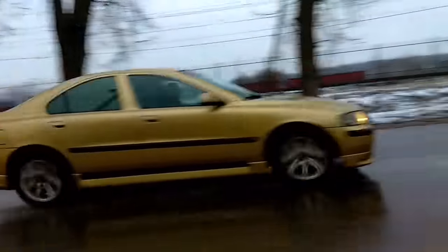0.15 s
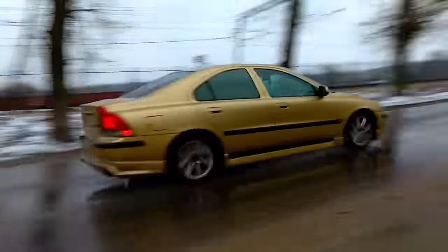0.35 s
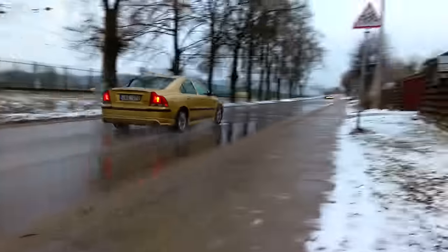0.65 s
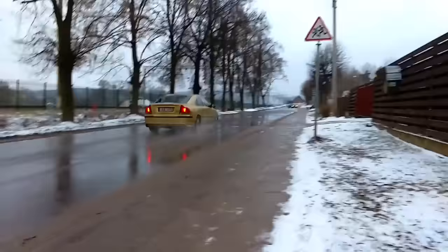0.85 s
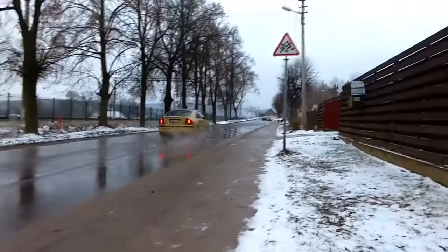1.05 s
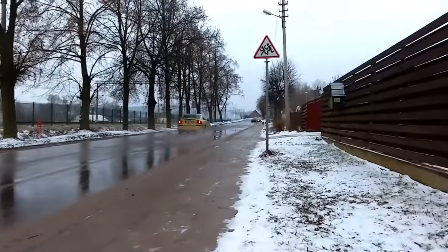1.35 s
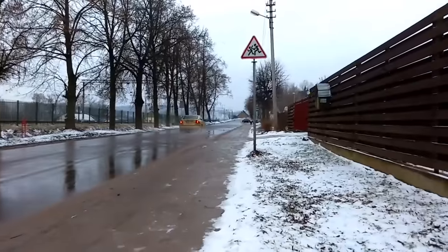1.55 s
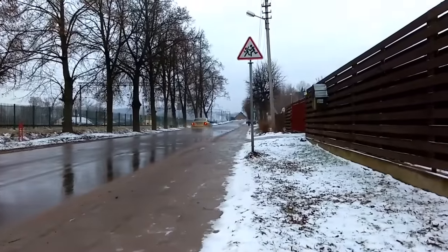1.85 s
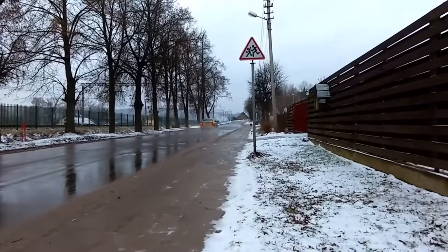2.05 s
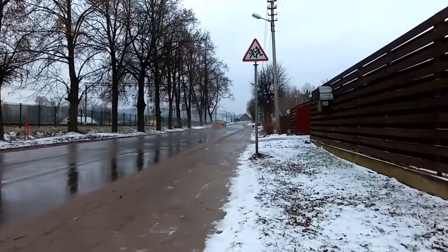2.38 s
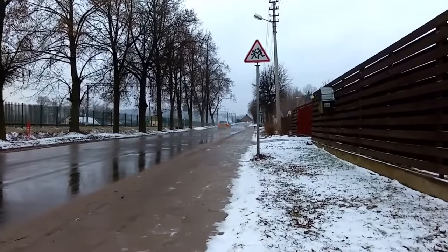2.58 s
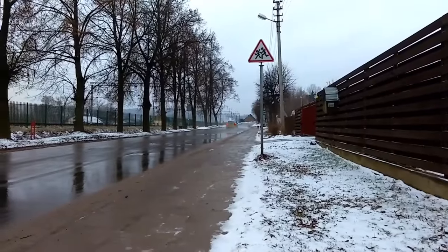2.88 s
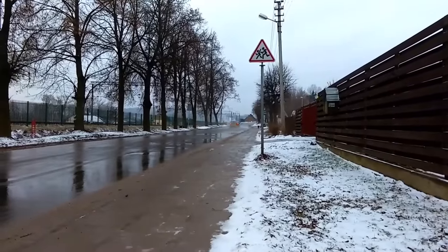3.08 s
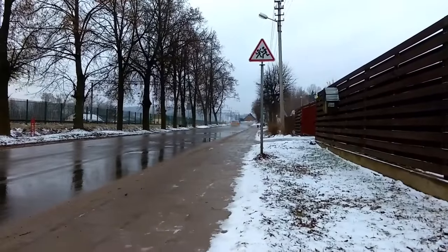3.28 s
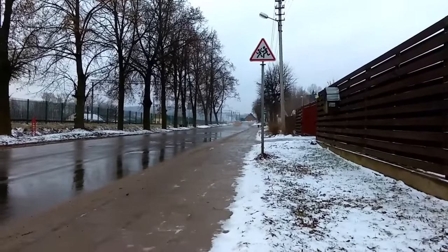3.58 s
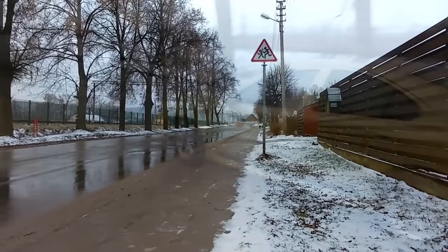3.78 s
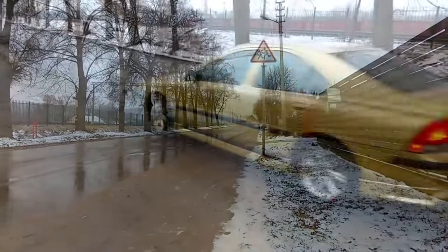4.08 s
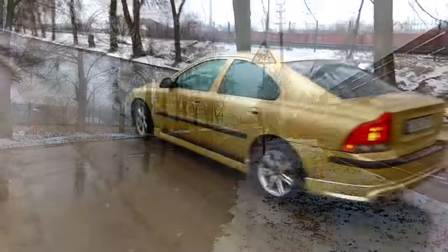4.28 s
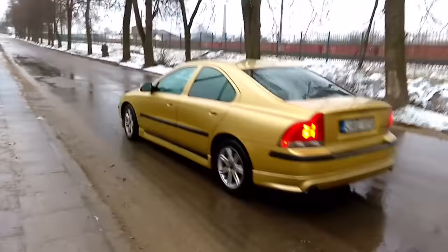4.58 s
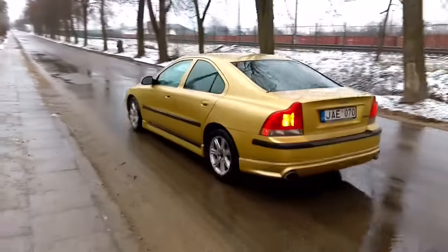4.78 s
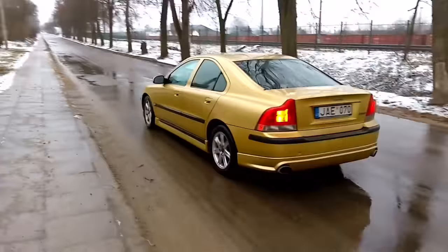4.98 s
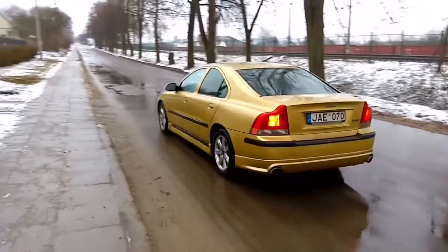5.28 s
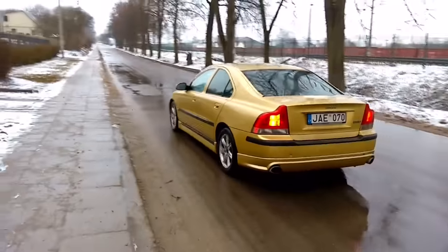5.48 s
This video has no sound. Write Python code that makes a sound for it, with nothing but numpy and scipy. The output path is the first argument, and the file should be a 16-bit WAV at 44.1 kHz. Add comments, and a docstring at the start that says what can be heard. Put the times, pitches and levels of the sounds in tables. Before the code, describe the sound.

A diesel car rushes past on a wet road and pulls away, then a close diesel engine revs up amid wind gusts.

```python
"""Beside a fence on a wet road, 4 m from the lane: two microphone ports in opposite polarity, light wind. A
five-cylinder diesel rushes past at once, its open exhaust droning over tyre roar and spray, and pulls away
while the fence echo closes in. From 3.6 s come a few short taps. After 4.1 s the scene fades into a second car
standing close by. Gusts slap the ports as it revs up from idle: the firings boom and ring the pipe, the block
clatters, gas hisses. Just after 5.1 s the throttle closes."""
import sys
import numpy as np
from scipy import signal
from scipy.io import wavfile
from scipy.ndimage import uniform_filter1d

SR = 44100
rng = np.random.default_rng(int(sys.argv[2]) if len(sys.argv) > 2 else 0)


def digitize_waveform(pressure):
    """Quantize a signal to 16-bit integers and store it at the path in sys.argv[1].

    Rows of a 2-D input are taken as channels; values are limited to [-1, 1].
    """
    field = np.atleast_2d(pressure).T
    bounded = np.clip(field, -1, 1)
    quanta = np.round(bounded * 32767).astype(np.int16)
    wavfile.write(sys.argv[1], SR, quanta)


N = 248280
SIZE, HOP = 1024, 256
HZ = np.fft.rfftfreq(SIZE, 1 / SR)[:, None]
FRAME_S = np.arange(-(-N // HOP) + 1) * HOP / SR
S = np.arange(N) / SR

# balance of the ports at the roadside: (frequency [Hz], left over right [dB])
ROAD_BALANCE = [(200, -2), (500, 3.5), (700, -5.5), (950, -2), (1250, 0), (1900, 9.5), (2500, -0.5),
                (3200, 5.5), (3900, 15.5), (5000, 2), (6500, -7), (9000, 0), (12000, -5.5), (15500, 1)]
# housing around the ports: (frequency [Hz], left lead [rad], near likeness [0-1], far likeness [0-1])
HOUSING = [(164, -0.14, 0.96, 1), (305, 0.37, 0.4, 1), (408, 0.64, 0.92, 0.98), (563, -0.16, 1, 0.99),
           (688, 0.19, 1, 0.98), (776, 0.64, 0.92, 0.91), (970, -0.13, 1, 1), (1130, -0.04, 0.52, 0.9),
           (1220, 1.5, 0.85, 0.86), (1380, 0.32, 1, 0.82), (1620, 0.15, 1, 1), (1890, 1, 0.43, .82),
           (2290, -0.27, 0.1, 0.72), (2500, 0.4, 0.1, 1), (2900, 0.5, 0.092, 0.93), (3240, 1.2, .2, 0.92),
           (3650, 1.5, .2, 0.68), (4400, 1, 0.13, 0.099), (6100, 4.5, 0.1, 0.17), (15000, 5, 0.066, 0.074)]


def amp(db):
    """Decibels to gain."""
    return 10 ** (np.asarray(db) / 20)


def unit_rms(x):
    """Scales to rms 1."""
    return x / np.sqrt(np.mean(abs(x) ** 2) + 1e-20)


def colour(points, column=1):
    """Reads a spectrum table at every bin."""
    rows = np.array(points, float)
    return np.interp(np.log(HZ + 1), np.log(rows[:, 0] + 1), rows[:, column])


def curves(rows, x):
    """Joins table rows by straight lines: one curve for each column after the first."""
    knots, *columns = np.transpose(rows)
    return [np.interp(x, knots, c) for c in columns]


def stft(x):
    """Short-time spectrum."""
    return signal.stft(x, nperseg=SIZE, noverlap=SIZE - HOP)[2]


def wander(count, rate_hz):
    """Slow random curves, roughly of unit size."""
    steps = rng.standard_normal((count, int(S[-1] * rate_hz) + 3))
    return np.array([np.interp(S * rate_hz, np.arange(len(row)), row) for row in steps])


def rush(shape_db, level_db, patchy_db, flicker_db, grain_db=0):
    """Two unrelated noises of one spectrum, with drifting patches, broadband flicker and fine grain."""
    patches = rng.standard_normal((len(FRAME_S), len(HZ))).T
    patches = unit_rms(uniform_filter1d(uniform_filter1d(patches, size=10, axis=0), size=10, axis=1))
    flicker = unit_rms(uniform_filter1d(rng.standard_normal(len(FRAME_S)), size=5))
    shape = amp(shape_db)
    shape = shape / np.sqrt(2 * (shape ** 2).sum(0) / 1.5)  # rms 1 under a Hann window
    grainy = rng.standard_normal((2, N)) * amp(grain_db * wander(1, 350))
    white = np.array([unit_rms(stft(v)) for v in grainy])
    return white * shape * amp(level_db + patchy_db * patches + flicker_db * flicker)


def echo_comb(delay_ms, share, blur_hz):
    """Comb of one echo that blurs towards the treble, where the fence slats scatter."""
    share = np.clip(share, 0, .9) / (1 + (HZ / blur_hz) ** 4)
    return (1 + share * np.exp(-2j * np.pi * HZ * delay_ms / 1000)) / np.sqrt(1 + share ** 2)


def microphone(tonal, noise, side_db, lag_ms, lead, likeness, close):
    """The right port hears the sound inverted and late; noise also arrives from all around."""
    # right port cavity: (frequency [Hz], half width [Hz], close gain [dB], far gain [dB])
    cavity = [(616, 31, -2, -2.5), (837, 94, -3.5, -9), (1115, 33, 8, 6), (1324, 193, -6, -4.5),
              (1925, 260, 10, 5), (2300, 146, -18, -2.5)]
    # the left port is a little more sensitive in the bass: (frequency [Hz], left over right [dB])
    bass_balance = [(60, -0.2), (90, 2.2), (135, 0.27), (300, 0)]
    apart = 1 / (1 + (180 / (HZ + 1)) ** 4)  # long waves reach both ports alike
    same = 1 - apart * (1 - np.clip(likeness, 0, 1))
    left = tonal + noise[0]
    right = tonal + same * noise[0] + np.sqrt(1 - same ** 2) * noise[1]
    turn = -np.exp(-1j * apart * (2 * np.pi * HZ * lag_ms / 1000 + lead))
    cavity_db = sum((far + close * (near - far)) / (1 + ((HZ - hz) / width) ** 2)
                    for hz, width, near, far in cavity)
    tilt = amp(colour(bass_balance) / 2 + apart * side_db / 2)
    return np.array([left * tilt, right * turn * amp(cavity_db) / tilt])


def wind():
    """Wind on the microphone: a lumpy rumble, unrelated at each port, and single slaps."""
    # strength of the rumble: (time [s], level [dB])
    breeze = [(0.0, -29), (0.11, -33.5), (0.2, -26), (0.3, -36), (0.4, -50), (0.95, -50), (1.12, -44),
              (1.25, -36.5), (1.5, -35.5), (1.85, -43.5), (2.2, -44.5), (2.6, -52), (3.3, -65), (3.8, -51),
              (4.1, -37), (4.38, -33), (4.48, -33), (4.9, -32), (5.15, -37), (5.58, -44), (5.63, -48)]
    # its spectrum: (frequency [Hz], density [dB])
    spectrum = [(15, -50), (30, -24), (45, -4), (80, -3), (150, -10), (300, -15), (600, -66)]
    # gusts: (time [s], level at the louder port [dB], frequency [Hz], left over right [dB])
    gusts = [(4.203, -31, 110, -8), (4.242, -23, 99, 20.5), (4.279, -22, 109, -14), (4.357, -17, 192, -11),
             (4.377, -16.5, 230, -19), (4.397, -16, 208, -11), (4.517, -25, 110, -10),
             (4.536, -22, 130, -8), (4.582, -23, 180, -8), (4.609, -20.5, 220, -10)]
    slaps = np.zeros((2, N))
    for s, db, hz, side_db in gusts:
        cycles = (S - s) * hz
        gains = amp(db + np.minimum(side_db * np.array([[1], [-1]]), 0))
        slaps += gains * np.exp(-(cycles / 0.49) ** 2) * np.sin(2 * np.pi * cycles + 1)
    rumble = rush(colour(spectrum), curves(breeze, FRAME_S)[0], patchy_db=1.8, flicker_db=1.2)
    return rumble + stft(slaps)


def taps():
    """A few short taps, each one quickly dying tone."""
    # taps: (time [s], level [dB], pitch [Hz], decay by 60 dB [s], right port lag [ms])
    hits = [(3.644, -10.5, 1250, 0.025, 0.13), (4.681, -20.5, 1640, 0.02, 0.25),
            (4.767, -17.5, 1750, 0.017, 0.36), (5.11, -16, 2110, 0.011, 0.31)]
    total = 0
    for s, db, hz, t60, lag_ms in hits:
        age = np.maximum(S - s, 0)
        attack = np.minimum(age / 0.00065, 1)
        tap = attack * amp(db - 60 * age / t60) * np.sin(2 * np.pi * hz * age)
        total += microphone(stft(tap), np.zeros(2), colour(ROAD_BALANCE), lag_ms, colour(HOUSING),
                            likeness=1, close=0)
    return total


def boom(hz, firings):
    """The standing exhaust booms at the firing rate and its next two harmonics."""
    # loudness of a firing tone at each pitch: (frequency [Hz], level [dB])
    response = [(26, -34), (47, -29), (65, -17), (80, -11.5), (98, -13.5), (110, -24), (135, -15.5),
                (172, -22), (196, -16), (218, -46), (240, -56), (250, -52)]
    fade_db = 95 * np.minimum(S - 4.67, 0)  # fades in, full at 4.67 s
    first_db, second_db = (curves(response, k * hz)[0] + fade_db for k in (1, 2))
    third_db = second_db - 3.5 - 40 * np.log10(1 + (hz / 70) ** 4)  # heard only at low revs
    levels = enumerate([first_db, second_db, third_db], 1)
    return np.sqrt(2) * sum(amp(db) * np.cos(2 * np.pi * k * firings) for k, db in levels)


def pipe_rings(firings):
    """Each firing kicks the modes of the exhaust pipe; the ringing is held at a steady level."""
    # the five uneven cylinders: (level [dB], lateness [firings])
    cylinders = [(-1, 0.063), (3, 0.057), (2, -0.066), (-1, 0.034), (2.5, -0.016)]
    # pipe modes: (frequency [Hz], bandwidth [Hz], level [dB])
    modes = [(206, 17, -11), (258, 7.9, -1.5), (312.5, 13, -1.5), (366, 16, -6.5), (393, 15.6, -12),
             (457, 13, -8), (526, 21, -15), (616, 16, -31)]
    count = np.arange(int(firings[-1]) - 1)
    kick_db, late = np.array(cylinders)[count % len(cylinders)].T
    jitter, scatter = rng.standard_normal((len(count), 2)).T
    at = np.interp(count + 1 + late + 0.017 * jitter, firings, np.arange(N)).astype(int)
    kicks = np.zeros(N)
    kicks[at] = amp(kick_db + 2.5 * scatter)
    throttle = np.clip(1 - (S - 5.14) / 0.056, 0.43, 1)  # closes at 5.14 s and the firings weaken
    swirl = 0.57 * rng.standard_normal(N)  # swirling gas keeps the modes sounding
    drive = throttle * unit_rms(kicks) + swirl
    t = np.arange(SR // 4) / SR
    ring = sum(amp(db) * np.exp(-np.pi * width * t) * np.sin(2 * np.pi * hz * t)
               for hz, width, db in modes)
    band = signal.butter(4, [175, 620], "band", fs=SR, output="sos")
    rings = signal.sosfilt(band, signal.oaconvolve(drive, ring)[:N])
    return rings / np.sqrt(uniform_filter1d(rings ** 2, size=SR // 10) + 1e-9)


def clatter_and_hiss(effort_db):
    """The block clatters and gas hisses, both louder as the engine works harder."""
    # block clatter: (frequency [Hz], density [dB])
    block = [(100, -5.5), (400, 9.5), (560, -12.5), (720, -3), (950, -2.5), (1150, -3), (1350, -1.5),
             (1560, 3.5), (1750, -3), (2000, -9), (2400, -1), (2900, -6), (3300, -12.5), (3900, -19),
             (5000, -33), (7000, -31.5)]
    # gas hiss: (frequency [Hz], density [dB])
    gas = [(2000, -9), (4500, -0.5), (6500, -3), (9000, -4), (12000, -6), (14000, -14), (16000, -21)]
    clatter = rush(colour(block), effort_db, patchy_db=1.4, flicker_db=0.79, grain_db=1.3)
    return clatter + rush(colour(gas), -28 + 0.72 * effort_db, patchy_db=3, flicker_db=0.74)


def standing_car():
    """A second diesel close to the microphone, revving up from idle."""
    # the rev: (time [s], firing rate [Hz], clatter level [dB], pipe level [dB])
    rev = [(4.1, 26, -40, -47), (4.27, 25.89, -36.5, -52), (4.36, 32.48, -36.5, -30.5),
           (4.44, 40.2, -36, -51), (4.54, 42.43, -34, -37), (4.68, 55.34, -30.5, -23),
           (4.84, 76.63, -27, -18.5), (4.96, 91.8, -24, -17), (5.02, 101.1, -24, -15),
           (5.08, 108.6, -22, -14), (5.18, 123, -24.5, -14), (5.26, 124.7, -26, -24),
           (5.32, 123.2, -25, -27), (5.4, 121.2, -25, -20), (5.46, 118.6, -26.5, -25),
           (5.51, 114.9, -25.5, -15), (5.56, 111.2, -27, -16), (5.63, 107, -28.5, -19.5)]
    # balance of the ports here: (frequency [Hz], left over right [dB])
    balance = [(200, -3), (500, 4), (700, -3), (950, -1), (1250, 2.5), (1900, 2.5), (2500, -4),
               (3200, 10.5), (3900, 11.5), (5000, 2), (6500, 0.5), (9000, 1), (12000, -7.5), (15500, -10)]
    # the housing from this side: (frequency [Hz], left lead [rad], likeness [0-1])
    housing = [(161, 0.5, 1), (292.4, 0, 0.88), (391, 1, 0.95), (560, 0.25, 0.65), (794, 0.24, 0.83),
               (1270, -0.36, 0.76), (1580, 0, 0.68), (1900, 1.4, 0.62), (2320, -0.1, 0.8),
               (2820, 0.4, 0.35), (3280, 2.5, 0.3), (4300, 1, 0.15), (6000, 4, 0), (15030, 1, .05)]
    start_s = rev[0][0]
    hz, _, pipe_db = curves(rev, S)
    firings = np.cumsum(hz) / SR
    engine = stft(boom(hz, firings) + amp(pipe_db) * pipe_rings(firings))
    echo_ms = 2.19 + 5.6 * np.exp(-np.maximum(FRAME_S - start_s, 0) / 0.373)  # nears as the car rolls on
    noise = clatter_and_hiss(curves(rev, FRAME_S)[1]) * echo_comb(echo_ms, share=0.18, blur_hz=2520)
    heard = microphone(engine, noise, colour(balance), lag_ms=0.023, lead=colour(housing),
                       likeness=colour(housing, column=2), close=1)
    return heard * (FRAME_S > start_s)


def firing_drone(cycle, tone_db, octave_db, twelfth_db):
    """Five firings to each engine cycle make a wavering tone with its octave and twelfth."""
    tone = np.sqrt(2) * amp(tone_db + .4 * wander(1, 25)[0]) * np.sin(5 * cycle)
    rough = np.clip(S - .3, .3, 1)  # the octave roughens as the car draws away
    octave = np.sqrt(2) * amp(octave_db + 2.8 * rough * wander(1, 12)[0])
    octave *= np.sin(10 * cycle + .4 * rough * wander(1, 25)[0])
    twelfth = amp(twelfth_db + 1.5 * wander(1, 15)[0]) * np.sin(15 * cycle)
    return tone + octave + twelfth


def exhaust_growl(cycle):
    """Uneven cylinders fill in tones at fifths of the firing rate; rms 1."""
    # exhaust orders: (frequency [multiples of the engine cycle rate])
    orders = [3, 4, 6, 7, 8, 9, 11, 12, 13, 14, 16, 17, 18, 19, 20, 21, 22, 23, 24]
    # strength of each order: (near level [dB], far level [dB])
    levels = [(-20, -27), (-7, -15), (-4, -5), (-19, -16), (-15, -15), (-6, -3), (-5, -5.5), (-15, -10),
              (-14, -17), (-1.7, 1.2), (-5, -3), (-12, -5), (-5.5, -1.5), (-3, -6.5), (-3, 0), (-6.5, -15),
              (-13, -7), (-9, -10), (-6, -4)]
    order = np.array(orders)[:, None]
    near_db, far_db = np.transpose(levels)[..., None]
    db = far_db + (near_db - far_db) * np.clip((1.1 - S) / .4, 0, 1)  # the tailpipe turns to the ports
    swell, drift = wander(len(orders), 9.7), wander(len(orders), 12)
    phase = order * cycle + 2 * np.pi * rng.random(order.shape) + .3 * drift
    return unit_rms((amp(db + 1.8 * swell) * np.sin(phase)).sum(0))


def wet_tyres(metres, fence_echo):
    """The tread roars on the wet road, echoed by the fence, and throws up hissing spray."""
    # tyres along the road: (time [s], roar level [dB], brightness [dB], spray level [dB])
    road = [(0.0, -16, 3.5, -23), (0.1, -14.5, 7, -20), (0.22, -14, 5, -21.5), (0.35, -14.5, 1, -25.5),
            (0.48, -16, 5.5, -26), (0.62, -12, 4, -27.5), (0.9, -14, 4.5, -30), (1.2, -12, -1.5, -28.5),
            (1.38, -12.5, -6, -32), (1.6, -13.5, -5, -30), (1.95, -14.5, -6, -34),
            (2.06, -17.5, -1.5, -34.5), (2.18, -15.5, -1, -36.5), (2.35, -17, -6.5, -40.5),
            (2.75, -17, -4.5, -37), (3.0, -17.5, -3.5, -41), (3.1, -19, 1, -38.5), (3.19, -20.5, -5, -39.5),
            (3.28, -22, -12, -39), (3.42, -22, -5, -40), (3.5, -22, -1, -41.5), (3.66, -25.5, 1.5, -38.5),
            (3.75, -27, 8, -39), (3.98, -29.5, 10.5, -42.5), (4.15, -33.5, 5.5, -46), (4.5, -37.5, -1, -59)]
    # tread roar: (frequency [Hz], density [dB])
    tread = [(40, -42), (80, -20), (120, -10), (190, -14), (250, -14), (380, -8.5), (500, 2), (620, 0),
             (780, -2), (950, -1.5), (1030, -6), (1120, -1), (1250, -3.5), (1500, -3), (1800, -8),
             (2250, -4), (2700, -9), (3200, -10), (3900, -19), (5000, -26.5), (7000, -48)]
    # spray: (frequency [Hz], density [dB])
    droplets = [(2000, -1), (4000, -7), (6500, -1), (8300, -1.5), (8800, -7), (10000, -2), (12000, -1),
                (15000, -0.5), (16000, -18)]
    roar_db, bright_db, spray_db = curves(road, FRAME_S)
    tread_db = colour(tread) + bright_db / (1 + (2400 / (HZ + 1)) ** 4)  # wetter stretches hiss higher
    air_db = -.14 * (HZ / 6540) ** 2 * np.minimum(metres, 55)  # damp air dulls the distant spray
    roar = rush(tread_db, roar_db, patchy_db=1.2, flicker_db=.25, grain_db=1.35)
    spray = rush(colour(droplets) + air_db, spray_db, patchy_db=1.5, flicker_db=.8)
    return roar * fence_echo + spray


def passing_car():
    """The diesel passes the microphone and pulls away along the fence, heard until 4.5 s."""
    # the engine: (time [s], firing rate [Hz], tone [dB], octave [dB], twelfth [dB], growl [dB])
    run = [(0.0, 128.1, -19, -22, -29, -23), (0.07, 130.1, -15, -17, -20.5, -26),
           (0.125, 130.1, -12.5, -29, -20, -13), (0.19, 130.5, -16, -16, -14.5, -14),
           (0.24, 126.5, -26, -11, -19, -13), (0.28, 127.8, -19, -12, -14, -17),
           (0.36, 127.4, -34, -11.5, -19, -10.5), (0.45, 125, -26, -10.5, -19.5, -14.5),
           (0.56, 124.8, -22, -17, -13.5, -10.5), (0.61, 123.7, -16, -17, -12.5, -10.5),
           (0.645, 123.9, -18, -10, -11, -9), (0.69, 125.8, -12, -20, -14, -13),
           (0.74, 126.1, -13.5, -29, -15.5, -12), (0.83, 128.6, -17.5, -38, -24, -14),
           (0.92, 127.8, -13.5, -33, -26, -15.5), (1.05, 126.4, -14.5, -28, -35, -18),
           (1.3, 129.7, -16, -24, -27, -21.5), (1.55, 132.8, -15, -22.5, -23.5, -24),
           (1.76, 134, -20, -28.5, -29, -29), (2.0, 136, -22, -28.5, -24.5, -22),
           (2.33, 138.9, -22.5, -31.5, -30, -23), (2.5, 140.9, -25.5, -34, -24.5, -26),
           (2.8, 143.2, -24, -23.5, -24, -19.5), (3.0, 145.7, -23, -29, -21.5, -23),
           (3.3, 147.1, -31, -31.5, -32.5, -25.5), (3.68, 143, -37, -37.5, -33, -28),
           (3.77, 142.3, -32, -31, -35, -23), (3.95, 145, -39, -35.5, -39, -30),
           (4.2, 144, -43, -38.5, -33, -31), (4.5, 142.7, -50, -39, -50, -59)]
    # the fence echo closes in as the car leaves: (time [s], delay [ms], share of the direct sound [0-1])
    fence = [(0, 9.4, 0.52), (.3, 4.3, 0.52), (.55, 3.2, 0.39), (.8, 1.99, 0.55), (1.0, 1.5, 0.55),
             (1.2, 1.22, 0.56), (1.4, 0.97, 0.58), (1.8, 0.76, 0.47), (2.1, 0.68, 0.38), (2.5, 0.68, 0.26),
             (3.1, 0.68, 0.31), (3.6, 0.62, 0.44), (3.75, 0.77, 0.28), (4.5, 0.7, 0.47)]
    # balance with the car abreast of the ports: (frequency [Hz], left over right [dB])
    abreast_balance = [(200, 0), (500, 1.5), (700, -3), (950, 1), (1250, -2), (1900, 1.5), (2500, -3.5),
                       (3200, 8), (3900, 13.5), (5000, 3.5), (6500, -4), (9000, -7.5), (12000, -1),
                       (15500, -12)]
    hz, tone_db, octave_db, twelfth_db, growl_db = curves(run, S)
    cycle = 2 * np.pi * np.cumsum(hz) / SR / 5
    metres = np.hypot(4, 18 * (FRAME_S - .15))  # 18 m/s along a lane 4 m away
    echo = echo_comb(*curves(fence, FRAME_S), blur_hz=1630)
    drone = stft(firing_drone(cycle, tone_db, octave_db, twelfth_db))
    growl = stft(amp(growl_db - 1.4) * exhaust_growl(cycle)) * echo
    tyres = wet_tyres(metres, echo)
    abreast = np.clip(8.1 / metres, 0, 1)
    side_db = abreast * colour(abreast_balance) + (1 - abreast) * colour(ROAD_BALANCE)
    near = np.exp(-metres / 15.4)  # far off the car shrinks to a point and the ports hear more alike
    likeness = near * colour(HOUSING, column=2) + (1 - near) * colour(HOUSING, column=3)
    lag_ms = 0.054 + 0.11 * np.exp(-FRAME_S / 1.25)  # the right port's lag settles as the car leaves
    heard = microphone(drone + growl, tyres, side_db, lag_ms, colour(HOUSING), likeness, close=abreast)
    return heard * (FRAME_S < 4.5)


def scene():
    """Adds the sources at the two ports and returns to the time domain."""
    total = passing_car() + standing_car() + wind() + taps()
    return signal.istft(total, nperseg=SIZE, noverlap=SIZE - HOP)[1][:, :N]


def record(dry):
    """The loudest peaks clip; then the band is limited to 20-16050 Hz."""
    clipped = np.clip(dry, -1.15, 1.15)
    low_cut = signal.butter(1, 20, "high", fs=SR, output="sos")
    high_cut = signal.firwin(511, 16050, window=("kaiser", 9), fs=SR)
    return signal.oaconvolve(signal.sosfilt(low_cut, clipped), high_cut[None], "same")


dry = scene()
out = record(dry)
digitize_waveform(out)
```